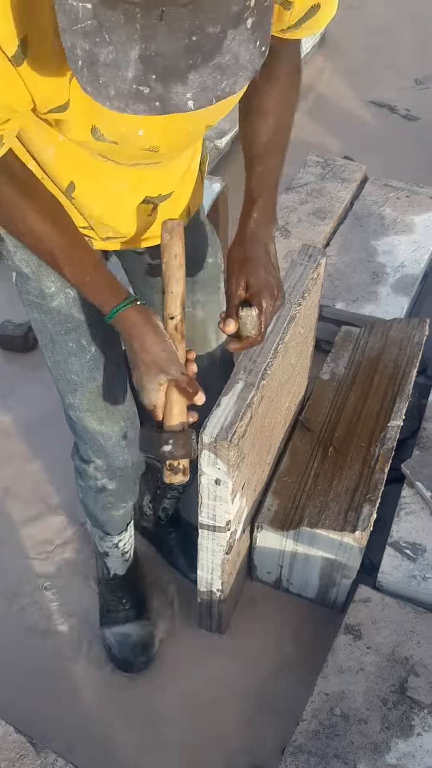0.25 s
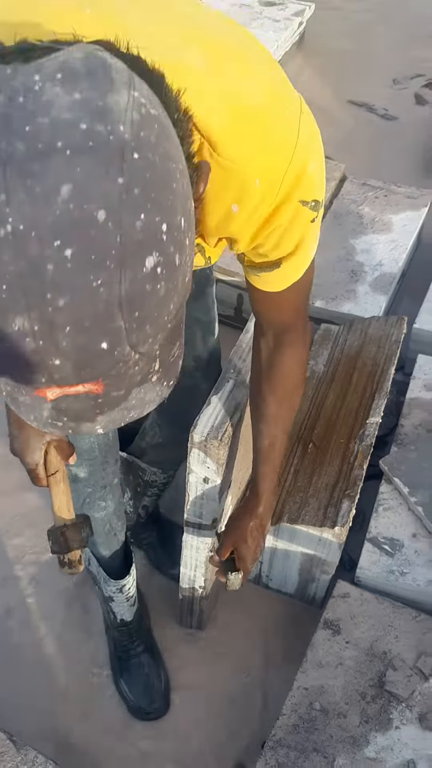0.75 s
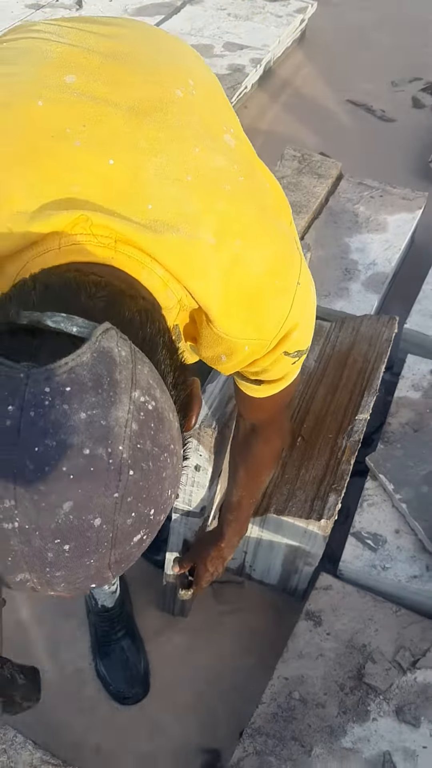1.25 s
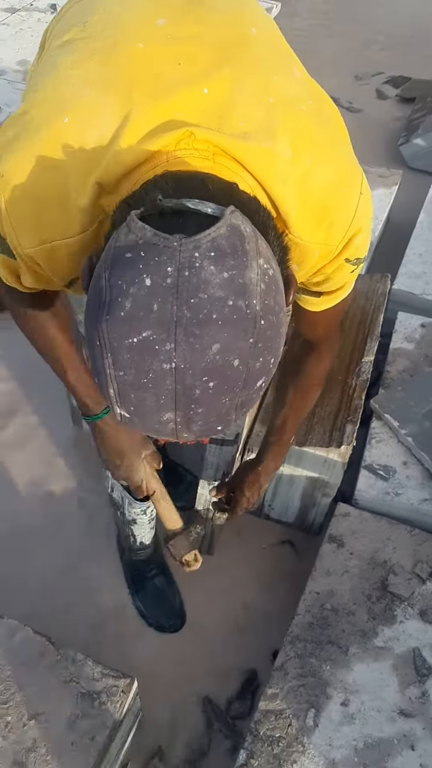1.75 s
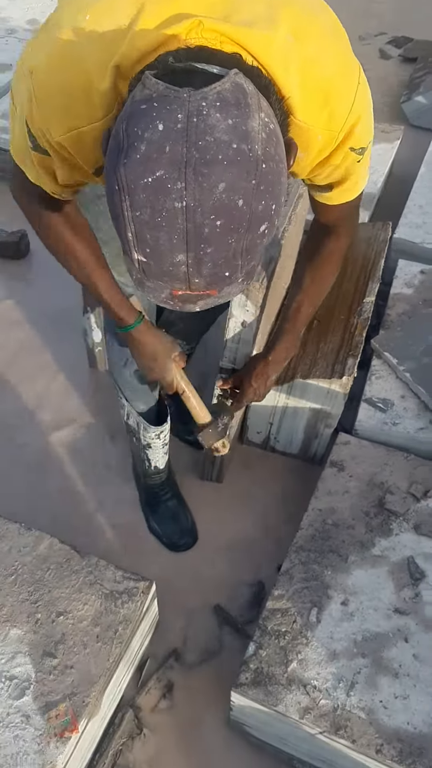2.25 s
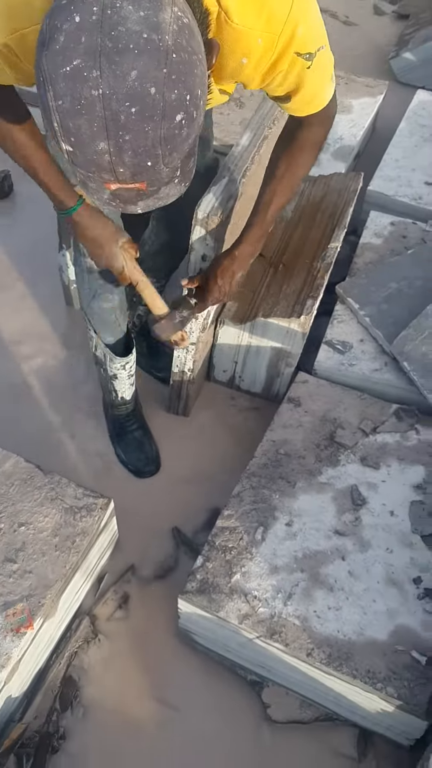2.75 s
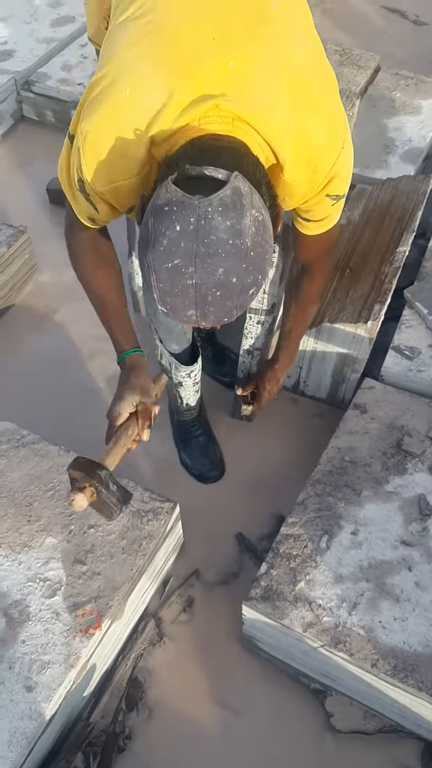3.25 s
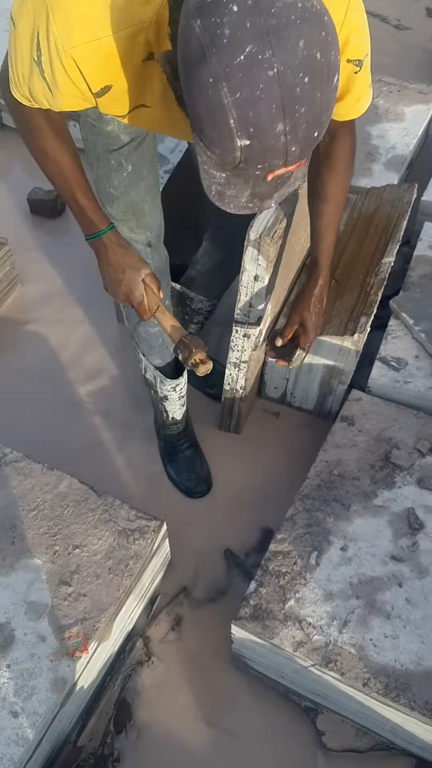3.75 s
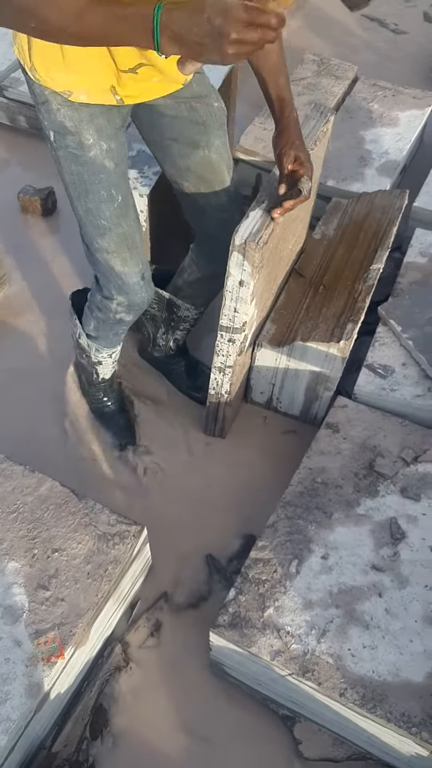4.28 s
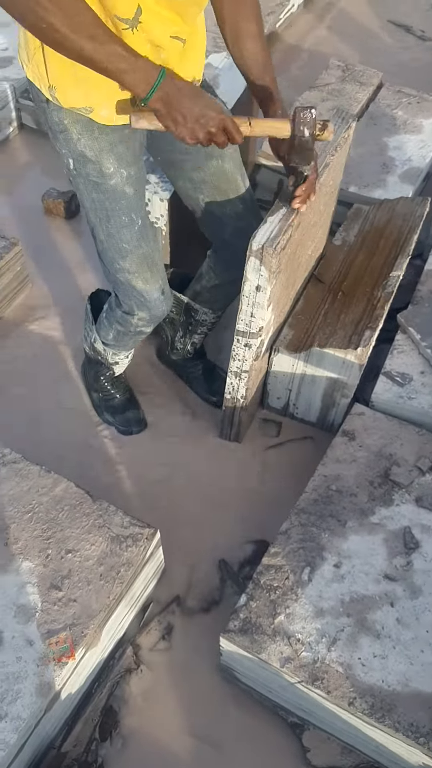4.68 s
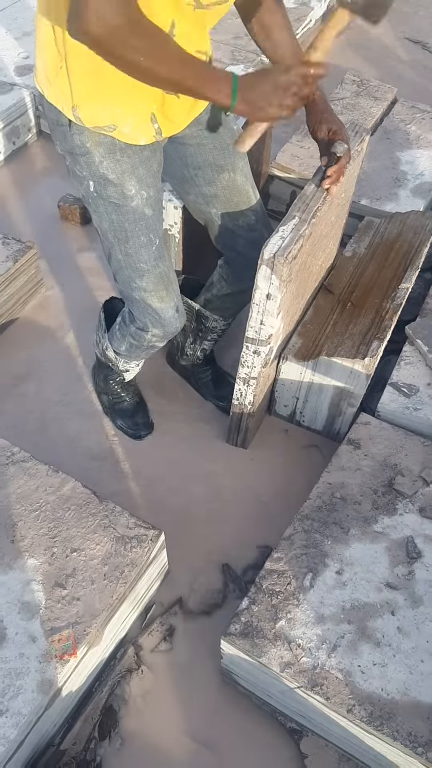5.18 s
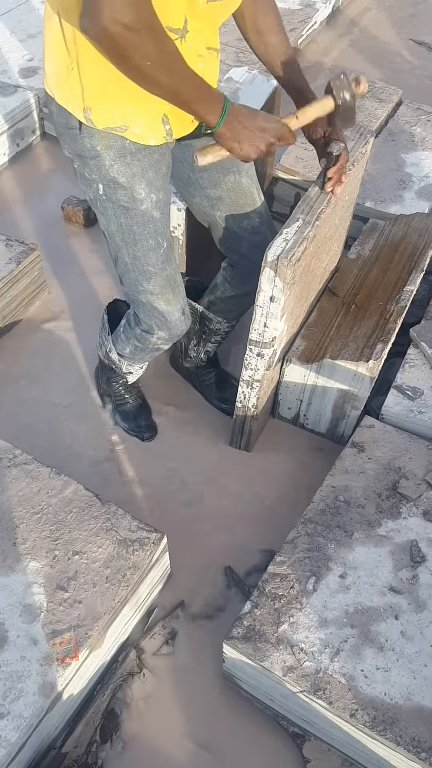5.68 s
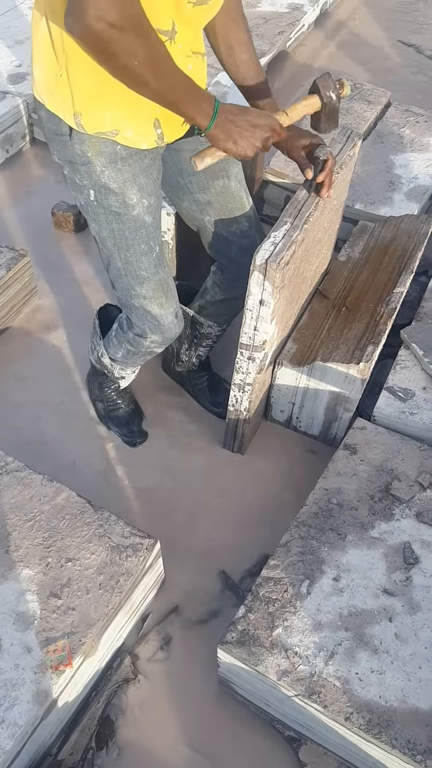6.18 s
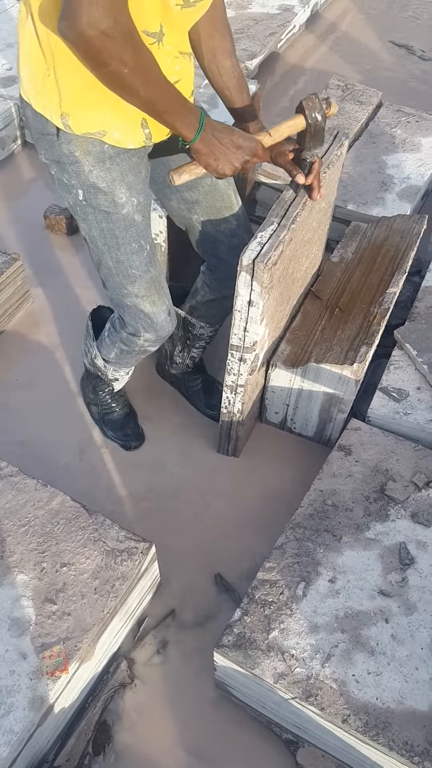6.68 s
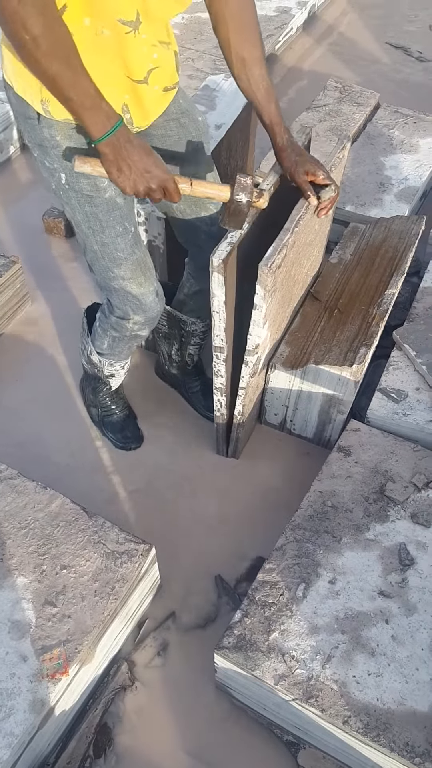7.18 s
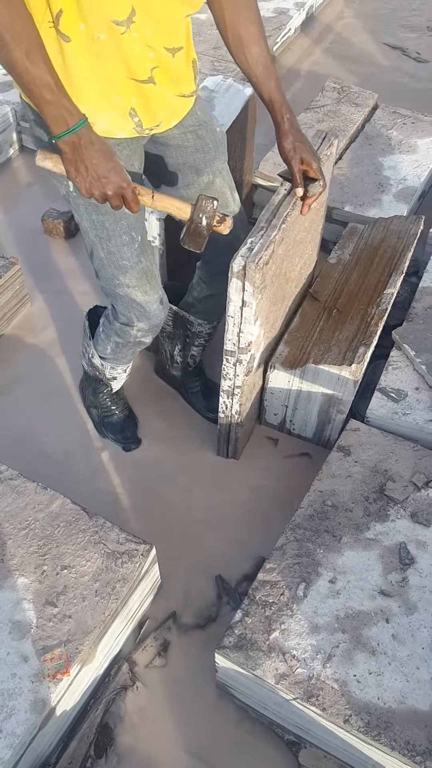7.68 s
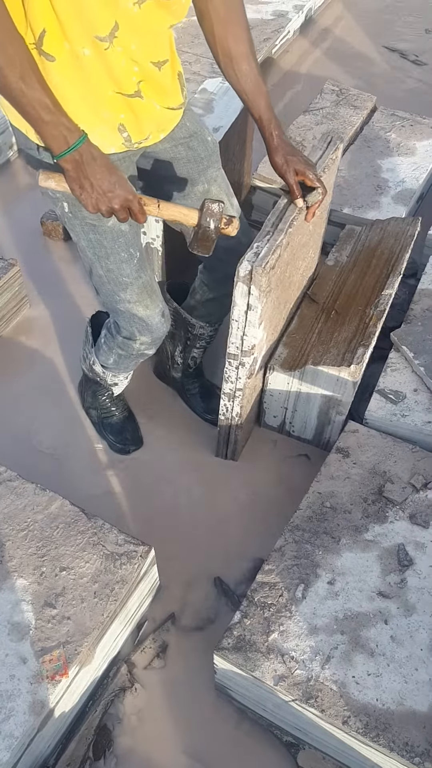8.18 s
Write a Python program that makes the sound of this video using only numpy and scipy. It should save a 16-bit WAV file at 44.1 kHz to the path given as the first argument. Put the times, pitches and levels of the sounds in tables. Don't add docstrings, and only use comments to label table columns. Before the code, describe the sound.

In an open stone yard, ringing steel strikes split a slab while loose slabs scrape and knock, with engine drone and water hiss behind.

```python
import sys
import numpy as np
from scipy import signal
from scipy.fft import rfft, irfft, next_fast_len
from scipy.io import wavfile
from scipy.ndimage import uniform_filter1d, map_coordinates

SR = 44100
rng = np.random.default_rng(int(sys.argv[2]) if len(sys.argv) > 2 else 0)


def elevation(decibels):
    levels = np.asarray(decibels, float)
    return 10 ** (levels / 20)


def bounce(signal):
    frames = np.transpose(np.atleast_2d(signal))
    limited = np.clip(frames, -1, 1)
    pcm = np.round(limited * 32767).astype(np.int16)
    wavfile.write(sys.argv[1], SR, pcm)


N = 371763
TIME = np.arange(N) / SR


def rms_one(x):
    return x / np.sqrt(np.mean(x ** 2) + 1e-20)


def in_time(rows):
    s, *columns = np.transpose(rows)
    return [np.interp(TIME, s, c) for c in columns]


def at_hz(points, hz):
    table_hz, values = np.transpose(points)
    return np.interp(np.log(hz + 1), np.log(table_hz + 1), values)


def drift(rate, count, size, step_s):
    r = np.exp(-2 * np.pi * rate * step_s)
    noise = rng.standard_normal((count, size + 400))
    slow = signal.lfilter([1], [1, -2 * r, r * r], noise)[:, 400:]
    return slow / slow.std(axis=1, keepdims=True)


def resonance(x, hz, width_hz):
    r = np.exp(-np.pi * width_hz / SR)
    zeros = np.array([1, 0, -1]) * (1 - r * r) / 2
    return signal.lfilter(zeros, [1, -2 * r * np.cos(2 * np.pi * hz / SR), r * r], x)


def add(out, s, sound):
    i = round(s * SR)
    out[:, i:i + sound.shape[1]] += sound[:, :N - i]


# (frequency [Hz], lead of the left port [rad])
PORT_PHASE = [(0, 0), (520, -0.1), (780, 2.5), (2760, 3.8), (4050, 7.1), (5600, 9.7), (8440, 18.6),
              (9220, 19.0), (9650, 22.0), (10200, 22.2), (12000, 27.5), (12900, 29.0), (15200, 34.6),
              (16100, 34.7)]
# (frequency [Hz], left minus right [dB])
LEFT_DB = [(60, 4), (110, -4), (200, 2.5), (380, -2.5), (700, -6), (1290, 1.5), (2380, -1.5), (4400, -2),
           (8120, 0), (15000, 2.5)]


def ports(hz, stretch=1):
    lead = np.interp(hz, *np.transpose(PORT_PHASE)) * stretch
    lean_db = at_hz(LEFT_DB, hz)
    return np.array([elevation(lean_db / 2) + 0 * lead, elevation(-lean_db / 2) * np.exp(-1j * lead)])


# (frequency [Hz], common share [0-1])
LIKENESS = [(60, 0.95), (150, 1), (500, 0.99), (700, 0.67), (1000, 0.76), (1700, 0.44), (2500, 0.52),
            (4000, 0.66), (8000, 0.46), (15000, 0.65)]
# (frequency [Hz], width [Hz], level before the turn [dB], after [dB])
HISS_DIPS = [(2250, 230, 1, -3.5), (2795, 460, 0.5, -6), (5340, 520, -1.5, -7.5), (8570, 430, -7.5, -3.5),
             (12370, 1100, -8, -8.5), (15550, 900, 0, 4)]
# (start [s], end [s])
TURN_S = (3.0, 3.6)
TURN_STRETCH = 0.049


def hiss(spectrum, patchy_db, flutter_db, blade):
    hz, s, (common, left, right) = signal.stft(rng.standard_normal((3, N)), SR, nperseg=1024)
    column_hz = hz[:, None]
    unturned = np.interp(s, TURN_S, [1, 0])

    patches = drift(2.9, count=32, size=len(s), step_s=s[1])
    place = 31 * np.sqrt(hz / hz[-1])
    grid = np.meshgrid(place, np.arange(len(s)), indexing="ij")
    db = patchy_db * map_coordinates(patches, grid, order=1)
    db += at_hz(spectrum, hz)[:, None]
    db += flutter_db * drift(23.0, count=1, size=len(s), step_s=s[1])
    for dip_hz, width_hz, early_db, late_db in HISS_DIPS:
        depth_db = late_db + (early_db - late_db) * unturned
        db += np.exp(-(2 * (column_hz - dip_hz) / width_hz) ** 2) * depth_db
    before, after = 1.8 * drift(0.4, count=2, size=len(hz), step_s=1)[..., None]
    db += unturned * before + (1 - unturned) * after

    power = np.ones_like(db)
    for top_hz, width_hz, level_db, from_s, to_s in blade:
        fades_s = [from_s - 0.2, from_s + 0.16, to_s - 0.2, to_s + 0.049]
        ringing = np.interp(s, fades_s, [0, 1, 1, 0])
        power += ringing * elevation(2 * level_db) / (1 + (2 * (column_hz - top_hz) / width_hz) ** 2)

    alike = np.clip(at_hz(LIKENESS, hz), 0, 1)[:, None]
    both = np.sqrt(alike) * common + np.sqrt(1 - alike) * np.array([left, right])
    heard = both * ports(column_hz, 1 + TURN_STRETCH * unturned) * elevation(db) * np.sqrt(power)
    return rms_one(signal.istft(heard, SR, nperseg=1024)[1][:, :N])


# (time [s], level [dB])
ENGINE = [(0.0, -29.5), (0.55, -30), (0.95, -27), (1.45, -29), (1.9, -32.5), (2.6, -34.5), (3.5, -33.5),
          (4.15, -35), (4.58, -34.5), (4.8, -31.5), (5.1, -34), (5.75, -36), (6.0, -33.5), (6.7, -33),
          (7.3, -31.5), (7.78, -29), (8.15, -25), (8.43, -25)]
# (frequency [Hz], level per Hz [dB])
RUMBLE = [(25, -35), (100, -20), (165, -19), (215, -35), (300, -0.5), (450, -4), (620, -8), (800, -9.5),
          (1000, -5), (1400, -11.5), (1900, -13.5), (2600, -59), (3500, -60)]


def engine_rumble():
    engine_db, = in_time(ENGINE)
    return elevation(engine_db - 3.5) * hiss(RUMBLE, patchy_db=2.5, flutter_db=2.0, blade=[])


# (time [s], cycle rate [Hz])
SPEED = [(0, 26.0), (.1, 25.9), (.7, 26.15), (1.3, 25.85), (1.8, 25.8), (3.2, 25.8), (3.85, 25.9),
         (4.2, 25.8), (4.75, 25.8), (5.6, 26.0), (5.95, 26.6), (6.4, 26.4), (7.2, 26.5), (7.85, 26.9),
         (8.1, 26.5), (8.43, 26.35)]
# (running light until [s], idling from [s], idling until [s], under load from [s])
LOAD_S = (3.0, 4.3, 5.6, 6.3)
# (multiple [-], level running light [dB], idling [dB], under load [dB])
ORDERS = [(5, -32.5, -32, -38), (6, -33, -29, -22.5), (7, -37, -35, -34), (8, -16.5, -15, -19),
          (9, -11.5, -11, -13.5), (10, -19, -14, -15.5), (11, -8, -10, -10), (12, -11, -7.5, -8),
          (13, -7, -7.5, -5), (14, -3, -1, 2.5), (15, -5, -10.5, -11.5), (16, -3, -2.5, -9.5),
          (17, -8, -6, -7.5), (18, -10, -13, -15.5), (19, -11, -9, -6.5), (20, 2, -7, -7.5),
          (21, -12, -10, -13.5), (22, -17, -15, -8), (23, -24, -21, -14), (25, -16, -20, -20),
          (28, -12, -12, -9.5), (29, -10, -16, -9), (30, -23, -28, -30), (32, -14, -17, -16),
          (33, -20, -18, -6.5), (34, -5.5, -6, -13), (35, -7.5, -12, -7.5), (36, 3, -5, 0),
          (37, 0, -7, -20), (41, -6.5, -18, -26)]
RATTLE_DB, RATTLE_FOLLOWS, RATTLE_LOAD_DB = -40, 0.96, -0.5


def engine_drone():
    step = 16
    time = TIME[::step]
    cycle_hz, engine_db = [c[::step] for c in in_time(SPEED) + in_time(ENGINE)]
    turns, size = np.cumsum(cycle_hz) * step / SR, len(cycle_hz)
    load = np.clip((time - LOAD_S[2]) / (LOAD_S[3] - LOAD_S[2]), 0, 1)

    def waver(rate):
        slow = drift(rate, count=len(ORDERS), size=size // 16 + 1, step_s=16 * step / SR)
        return uniform_filter1d(slow.repeat(16, axis=1), size=16)[:, :size]

    swell, wander = waver(6.6), waver(2.82)
    k = np.transpose(ORDERS)[0][:, None]
    sheet = k[:, 0] > 26.5
    level_db = np.array([np.interp(time, LOAD_S, [light, idle, idle, loaded])
                         for _, light, idle, loaded in ORDERS])
    gain = elevation(level_db + np.where(sheet[:, None], 2.5, 3.2) * swell)
    lines = gain * np.sin(2 * np.pi * k * turns + 0.71 * wander + k * k * 0.9)

    rattle_db = RATTLE_DB + RATTLE_FOLLOWS * (engine_db - engine_db.mean()) + RATTLE_LOAD_DB * load
    mono = elevation(engine_db + 0.5) * rms_one(lines[~sheet].sum(axis=0))
    mono += elevation(rattle_db + 7.5) * rms_one(lines[sheet].sum(axis=0))
    size = next_fast_len(size)
    heard = rfft(mono, size) * ports(np.fft.rfftfreq(size, step / SR))
    return step * irfft(heard, step * size)[:, :N]


# (time [s], level [dB])
SAW_LEVEL = [(0.0, -26), (0.45, -27.5), (0.91, -25.5), (1.48, -25.5), (1.78, -26), (2.16, -29.5), (2.54, -31),
             (2.89, -29.5), (3.6, -29), (4.5, -29.5), (4.79, -26.5), (5.3, -27.5), (5.85, -31.5), (6.74, -30.5),
             (7.2, -28.5), (7.85, -25.5), (8.15, -20.5), (8.43, -21)]
# (frequency [Hz], level per Hz [dB])
SAW = [(900, -70), (1600, -13.5), (2000, -10), (2600, -1.5), (3300, 0.5), (4000, 0), (4700, 3.5), (5400, 3),
       (6200, -2.5), (6800, -5.5), (7400, -5.5), (8400, -19.5), (9500, -78), (11000, -50)]
# (frequency [Hz], width [Hz], level over the hiss [dB], from [s], to [s])
BLADE = [(2540, 65, 11, 10, 1.9), (2830, 520, 3, -4.8, 2.18), (3120, 114, 12, -3, 0.55),
         (3360, 21, 12, 0.54, 1.67), (4004, 110, 13.5, -4.5, 0.68), (3470, 2100, -5.5, 2.5, 9.0),
         (4710, 51, 5, 6, 9.0), (6803, 120, 9.5, 0, 9.0), (1890, 38, 12.5, -12, 9.0),
         (2060, 200, 7.5, -4, 2.2), (15000, 290, 12, -6, 0.65)]


def stone_saw():
    saw_db, = in_time(SAW_LEVEL)
    return elevation(saw_db + 3.5) * hiss(SAW, patchy_db=1.12, flutter_db=0.99, blade=BLADE)


# (frequency [Hz], level per Hz [dB])
SPRAY = [(6500, -81), (8500, -5.5), (9800, -2.5), (11000, 2), (12600, 7.5), (14500, -2.5), (15600, 7),
         (15850, -45)]
SPRAY_DB, SPRAY_FOLLOWS = -37.5, 0.83


def water_spray():
    saw_db, = in_time(SAW_LEVEL)
    spray_db = SPRAY_DB + SPRAY_FOLLOWS * (saw_db - saw_db.mean())
    return elevation(spray_db + 2.5) * hiss(SPRAY, patchy_db=0.6, flutter_db=-1.0, blade=BLADE[-1:])


def strike(modes, grind_s, alike, spread_db, soft_hz, rise_s=1e-4):
    t = np.arange(4096) / SR
    force = np.exp(-(t / grind_s) ** 1.24) + 0.67 * np.exp(-t / 0.00049) + 1e-9
    grit = rng.standard_normal((3, 4096)) * force * (1 - np.exp(-t / rise_s))
    grit = np.sqrt(alike) * grit[0] + np.sqrt(1 - alike) * grit[1:]
    luck = rng.standard_normal(len(modes))
    out = np.zeros((2, 4096))
    for (hz, db, t60), chance in zip(modes, luck):
        ring = resonance(grit, min(hz, 0.45 * SR), np.log(1000) / np.pi / t60)
        heard = np.sqrt(np.mean(ring.mean(axis=0) ** 2 + ring ** 2 / 10))
        out += elevation(db + spread_db * chance) * ring / heard
    out *= 1 - (t / t[-1]) ** 4
    band = signal.butter(3, [220, min(soft_hz, 0.45 * SR)], "band", fs=SR, output="sos")
    out = signal.sosfilt(band, out)
    return out / np.abs(out.mean(axis=0)).max()


# (time [s], peak [dB],
# dull side [dB], bright side [dB], loudest note [Hz])
KNOCKS = [(0.862, -13, -10, -14, 818), (0.863, -18, 0, -15, 330), (1.247, -23, 18, 35, 930),
          (6.042, -34, -1, -23, 768), (7.651, -8.5, -12, -12, 460), (7.650, -14.5, -9, -5, 861),
          (8.281, -20, 11, 23, 733), (8.336, -9, -4, -10, 420), (8.335, -14, -4, -7, 645),
          (7.795, -22, 0, -13, 430), (8.03, -17.5, 0, -15, 450)]
# (time [s], peak [dB], dull side [dB], bright side [dB], loudest note [Hz])
SCUFFS = [(0.9605, -4.5, -8, 0, 607), (0.967, -9, -14, 3, 595), (0.972, -8.5, -13, 6, 1600),
          (0.979, -6, -15, -8, 835), (0.984, -9, -5, -19, 826), (0.997, -10, 4, -7, 670),
          (1.004, -11.5, -11, 1, 700), (1.013, -16, -2, -10, 560), (1.025, -12, 0, -4, 410),
          (1.035, -14, 0, -8, 560), (1.049, -15, 7, -3, 427), (1.06, -20, 4, -5, 600),
          (5.667, -14.5, -2, -1, 810), (5.672, -16, -14, 1, 800), (5.679, -16, -7, 4, 1800),
          (5.689, -16, -13, 1, 593), (5.697, -22, -12, -6, 700), (5.706, -21, -12, -7, 1052),
          (5.907, -21.5, 0, 2, 700), (5.915, -23.5, -4, -3, 1000), (5.928, -26, -6, 0, 1100),
          (1.074, -20, 0, -2, 500), (1.088, -22, 0, 2, 650), (1.102, -23, 0, 6, 1200),
          (1.117, -24, 0, 4, 800)]
# (frequency [Hz], t60 [s])
LOOSE = [(340, 0.12), (420, 0.2), (520, 0.012), (600, 0.037), (680, 0.027), (830, 0.048), (950, 0.036),
         (1100, 0.0024), (1300, 0.011), (1500, 0.008), (1750, 0.063), (2000, 0.068), (2300, 0.014)]
KNOCK_GRIND_S, SCUFF_GRIND_S = 0.0079, 0.0087
KNOCK_SPREAD_DB = 2.5
KNOCK_RISE_S = 0.0014


def loose_slabs():
    out = np.zeros((2, N))
    for contacts, grind_s in (KNOCKS, KNOCK_GRIND_S), (SCUFFS, SCUFF_GRIND_S):
        for s, peak_db, dull_db, bright_db, note_hz in contacts:
            tilt_db = [dull_db, -2.5, 0, bright_db]
            modes = [(hz, np.interp(hz, [470, 700, 930, 1330], tilt_db), t60) for hz, t60 in LOOSE]
            modes.append((note_hz, 11.5, 0.035))
            soft_hz = 1900 * elevation(0.31 * bright_db)
            knock = strike(modes, grind_s, 0.47, KNOCK_SPREAD_DB, soft_hz, KNOCK_RISE_S)
            add(out, s, elevation(peak_db) * knock)
    return out


# (time [s], steel peak [dB], stone level [dB])
TAPS = [(1.6302, -6, -9.5), (2.016, -8, -20), (2.324, -12.5, -26), (2.612, -13.5, -27), (2.873, -15.5, -29),
        (3.127, -17, -39), (3.385, -55, -27), (3.6325, -20, -29), (3.8695, -21.5, -22), (4.0995, -21, -26),
        (4.336, -24, -26.5), (4.5686, -26, -25), (4.8109, -24, -25), (5.0447, -19, -23), (5.2894, -19, -21),
        (5.5211, -21, -21.5), (5.751, -23, -27), (5.972, -21, -21.5), (6.2024, -28, -22),
        (6.4291, -29, -25), (6.6537, -22, -22), (6.877, -24, -22.5), (7.101, -46, -24), (7.324, -34, -22.5),
        (7.543, -20, -19), (7.7786, -20, -16), (8.022, -32, -18), (8.2662, -18, -24)]
# (time [s], lower stone modes [dB], steel note [Hz], stone note [Hz])
TAP_NOTES = [(1.6307, -34, 3290, 1950), (2.0164, -21, 3166, 2140), (2.3224, -40, 3570, 1372),
             (2.6114, -25, 3500, 1860), (2.8724, -33, 3700, 1694), (3.1264, -50, 3530, 1990),
             (3.3844, -48, 3750, 1890), (3.6304, -52, 3400, 2030), (3.8656, -44, 3624, 1947),
             (4.1006, -51, 3660, 1890), (4.3365, -40, 3120, 1820), (4.5674, -29, 3520, 1557),
             (4.8115, -26, 3360, 2017), (5.0454, -27, 3680, 1987), (5.2894, -38, 3780, 1950),
             (5.5214, -32, 3750, 1840), (5.7514, -28, 3730, 1880), (5.9718, -35, 3735, 1830),
             (6.2043, -35, 3560, 1734), (6.4293, -27, 3077, 1725), (6.6538, -33, 3650, 1748),
             (6.8773, -42, 3590, 2010), (7.1023, -27, 3515, 1720), (7.3238, -21, 3500, 1963),
             (7.5443, -25, 3340, 1890), (7.7812, -17, 3680, 1721), (8.0242, -17, 3520, 1458),
             (8.2666, -34, 3547, 1840)]
# (frequency [Hz], level [dB], t60 [s])
FAR_STEEL = [(4500, -19, 0.011), (5050, -22, 0.012), (6460, -14, 0.012)]
FAR_THUD_DB, FAR_THUD_DB_PER_S, FAR_THUD_LAG_S = -12.5, 1.5, 0.02


def far_taps():
    out = np.zeros((2, N))
    low_modes = [(1100, -4, 0.015), (1250, -5, 0.014), (1430, -1, 0.012)]
    for (s, steel_db, stone_db), (_, low_db, steel_hz, stone_hz) in zip(TAPS, TAP_NOTES):
        steel = FAR_STEEL + [(steel_hz, 0, 0.014), (1.047 * steel_hz, -5, 0.012)]
        stone = [(stone_hz, 0, 0.018), (1500, -24, 0.012), (1.15 * stone_hz, -6, 0.014)]
        thud_db = stone_db + FAR_THUD_DB + FAR_THUD_DB_PER_S * s
        add(out, s, elevation(steel_db + 4.0) * strike(steel, 0.0017, 0.66, 1.2, 7000))
        add(out, s + 0.001, elevation(stone_db) * strike(stone, 0.0035, 0.18, 2.2, 2650))
        add(out, s + 0.00397, elevation(low_db - 3.5) * strike(low_modes, 0.011, 0.5, 1.5, 2000))
        thud = strike([(390.0, 0, 0.038)], 0.0019, 0.98, 0, 1060)
        add(out, s + FAR_THUD_LAG_S, elevation(thud_db) * thud)
    return out


# (time [s], air push peak [dB], ground thud peak [dB], ring of the cutting edge [dB])
JOLTS = [(1.672, -40, -17, -1), (2.281, -56, -21, -8), (2.782, -43, -14.5, -14), (3.47, -46, -12, -16.5),
         (4.63, -62, -14.5, -8), (5.264, -44, -22, -4), (5.724, -45, -15.5, -12), (6.127, -64, -13.5, -25),
         (6.451, -67, -15, -22), (6.726, -70, -23, -2)]
# (time [s], ground thud note [Hz], split edge note [Hz], split edge level [dB])
SEATS = [(1.672, 370, 2130, -6), (2.281, 630, 3865, 0), (2.783, 420, 2800, -2), (3.47, 360, 3820, -3),
         (4.631, 540, 2220, -4), (5.265, 667, 4390, -3), (5.725, 664, 1570, -4), (6.125, 667, 3970, -6),
         (6.451, 667, 2340, -5), (6.727, 390, 1260, 2)]
# (frequency [Hz], level [dB], t60 [s])
THUD = [(317.8, -23, 0.2), (442, 19.5, 0.039), (554, 17.5, 0.044), (650, 13, 0.065)]


def ground_jolts():
    out, t = np.zeros((2, N)), np.arange(2048) / SR
    push = np.sin(2 * np.pi * 75 * t) * np.exp(-t / 0.0059) * np.ones((2, 1))
    for (s, push_db, thud_db, _), (_, thud_hz, _, _) in zip(JOLTS, SEATS):
        add(out, s, elevation(push_db + 9.0) * push)
        thud = strike(THUD + [(thud_hz, 22, 0.045)], 0.0064, 0.82, 0.33, 1760)
        add(out, s + 0.0028, elevation(thud_db) * thud)
    return out


# (time [s], body [dB], flanks [dB], free end [dB], struck head [dB])
WEDGE = [(1.672, -5, -12, -10, 4), (2.281, -23, -5, 2, 1.5), (2.783, 1.5, -9, 4, -18),
         (3.47, 4, -13, -4, 5), (4.631, -3, -4, -15, -2), (5.265, -9, 2, 0, 0), (5.725, -5, 5, -7, -19),
         (6.128, 9, 1, -20, -30), (6.451, 5.5, -2, -21, -8), (6.727, -7, -8, -8, 2)]
# (frequency [Hz], level [dB], t60 [s])
BODY = [(3053, -2.5, 0.041), (3020, 1, 0.031)]
FLANKS = [(3310, 0.5, 0.035), (3340, -11, 0.023), (3520, 0, .02), (3680, -2, 0.017)]
HEAD = [(4860, -8, .02), (4984, 1.5, .025), (5140, -2.5, 0.016)]
EDGE = [(5720, 6, .008), (6130, 5, .012), (6440, -6, .02), (6480, -1, 0.029)]


def wedge_modes(k, end_hz):
    _, _, seat_hz, seat_db = SEATS[k]
    free_end = [(end_hz, 0, 0.022), (1.026 * end_hz, -5, 0.016)]
    parts = BODY, FLANKS, free_end, HEAD, EDGE, [(seat_hz, 0, 0.018)]
    parts_db = [*WEDGE[k][1:], JOLTS[k][3], seat_db]
    return [(hz, db + part_db, t60) for part, part_db in zip(parts, parts_db) for hz, db, t60 in part]


# (frequency [Hz], level [dB], t60 [s])
SLAB = [(900, -11, 0.012), (1020, 10.5, 0.0065), (1330, 3, 0.012), (1460, -27, 0.018), (1960, -19, 0.023),
        (2340, -1, 0.026)]


def slab_modes(note_hz):
    return [(hz, db - 9 * abs(np.log2(hz / note_hz)), t60) for hz, db, t60 in SLAB]


# (time [s], peak [dB], slab note [Hz], slab against the peak [dB], ring of the free end [Hz])
BLOWS = [
    (1.6718, -3.5, 950, -9, 4200),
    (2.2814, -3.5, 950, -12.5, 4190),
    (2.7833, -4, 1042, -12, 4155),
    (3.4703, -3.5, 1060, -6.5, 3940),
    (4.6309, -5, 960, -1.5, 3930),
    (5.2654, -3.5, 1324, -7, 4005),
    (5.7246, -3, 925, -5.5, 3900),
    (6.1248, -10, 1263, -1.5, 3820),
    (6.4511, -8.5, 1220, -3, 3810),
    (6.7272, -17, 1430, 8.5, 3942),
]
# (time [s], second touch after [s], second touch against the peak [dB], hammer head ring [dB])
REBOUNDS = [(1.672, .005, -3, -7), (2.281, .003, -2, -6.5), (2.783, .003, -6, -16), (3.47, .0025, -5, -17),
            (4.631, .004, -2, -15), (5.265, 0.0032, -4, -14), (5.725, .003, -3, -18),
            (6.125, .004, 6.5, -16), (6.451, 0.0029, -2, -17), (6.727, .003, -6, -22)]
# (frequency [Hz], level [dB], t60 [s])
SPLINTER = [(7550, -13, 0.0065), (10900, -3, 0.016), (12130, 2, 0.033), (13500, -12, 0.014),
            (15100, -3, 0.038)]
CRACK_DB, CRACK_DB_PER_BLOW = -10, -0.5


def hammer_blows():
    out = np.zeros((2, N))
    impact = [(2400, -7, 0.0036), (4630, -12, 0.00083), (7000, 16, 0.00028)]
    for k, (s, peak_db, note_hz, slab_db, end_hz) in enumerate(BLOWS):
        _, again_s, again_db, head_db = REBOUNDS[k]
        steel, slab = wedge_modes(k, end_hz), slab_modes(note_hz)
        first = strike(steel, 0.0026, 0.26, 0.67, 7400, rise_s=0.00012)
        add(out, s, elevation(peak_db - 1.0) * first)
        second = strike(steel, 0.0025, 0.3, 2.5, 5800, rise_s=0.00033)
        add(out, s + again_s, elevation(peak_db - 2.0 + again_db) * second)
        crack_db = peak_db + CRACK_DB + CRACK_DB_PER_BLOW * k
        add(out, s, elevation(crack_db) * strike(impact, 0.0026, 0.3, 3.0, 16700))
        add(out, s, elevation(peak_db + head_db) * strike(SPLINTER, 0.0017, 0.36, 1.5, 19000))
        answer = strike(slab + [(note_hz, 7, 0.035)], 0.0071, 0.27, 2.3, 3900)
        add(out, s + 0.002037, elevation(peak_db + slab_db - 2.0) * answer)
        echo = strike(steel + slab, 0.011, 0.18, 3.9, 4200)
        add(out, s + 0.016, elevation(peak_db - 22.0) * echo)
    return out


def scene():
    machines = engine_rumble() + engine_drone() + stone_saw() + water_spray()
    machines = signal.sosfilt(signal.butter(2, 70, "high", fs=SR, output="sos"), machines)
    return machines + loose_slabs() + far_taps() + ground_jolts() + hammer_blows()


def low_pass(x):
    return signal.sosfilt(signal.butter(12, 16510, fs=SR, output="sos"), x)


def record(dry):
    top = signal.cheby2(14, 70, 16520, fs=SR, output="sos")
    rounded = 1.074 * np.tanh(dry / 1.11)
    return low_pass(signal.sosfilt(top, rounded))


dry = scene()
out = record(dry)
bounce(out)
```